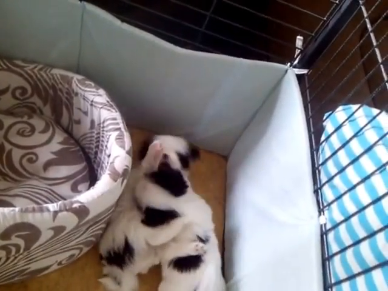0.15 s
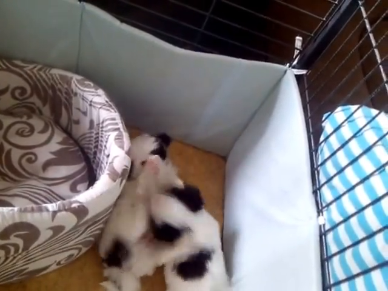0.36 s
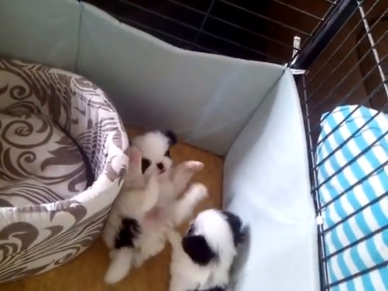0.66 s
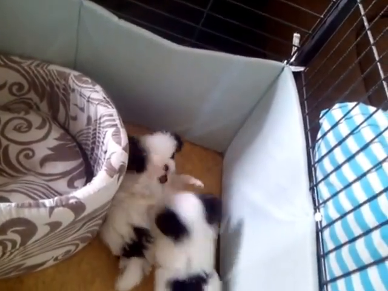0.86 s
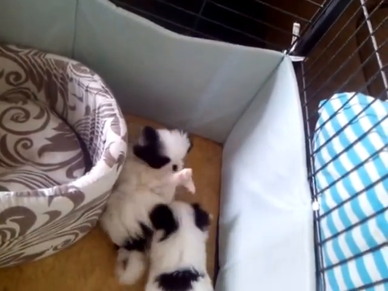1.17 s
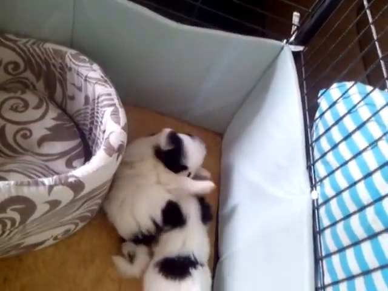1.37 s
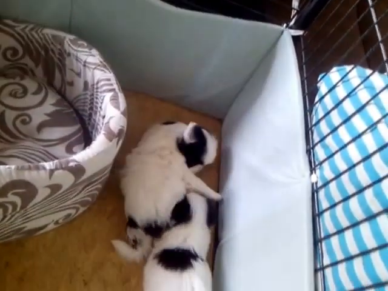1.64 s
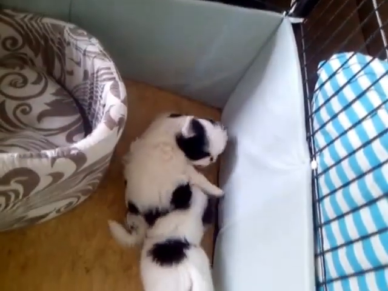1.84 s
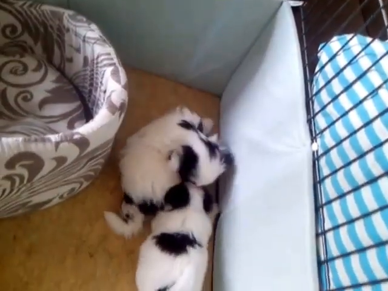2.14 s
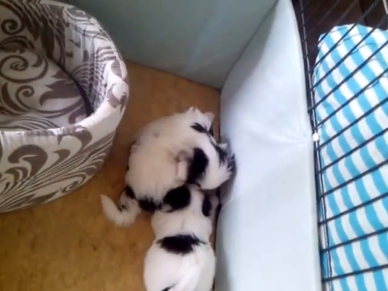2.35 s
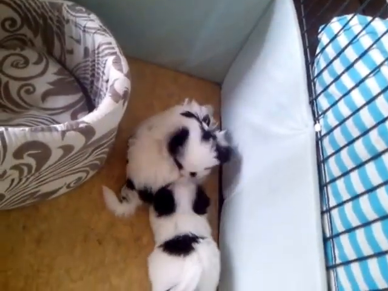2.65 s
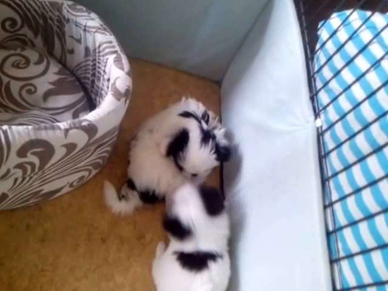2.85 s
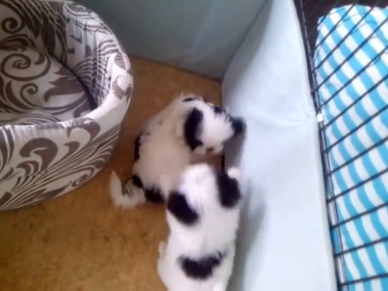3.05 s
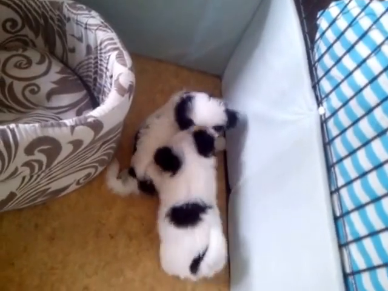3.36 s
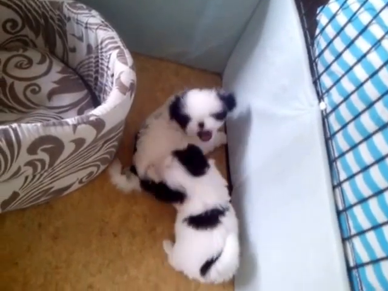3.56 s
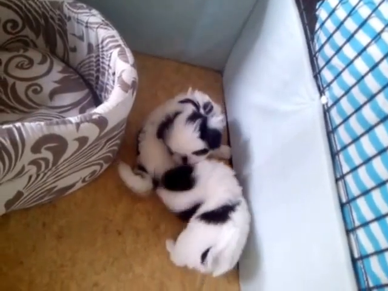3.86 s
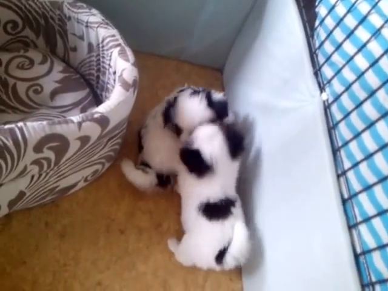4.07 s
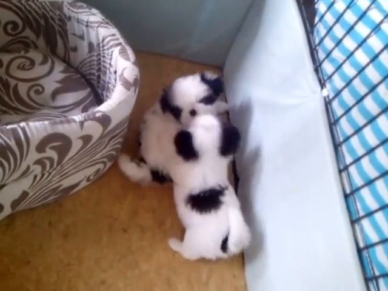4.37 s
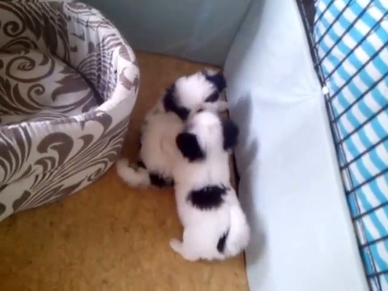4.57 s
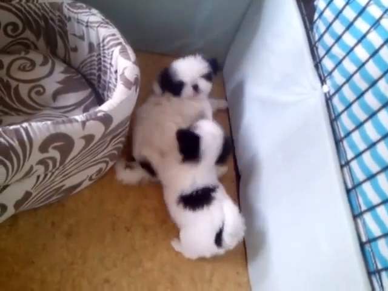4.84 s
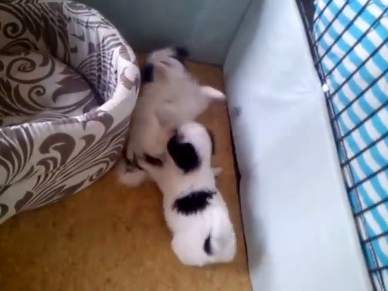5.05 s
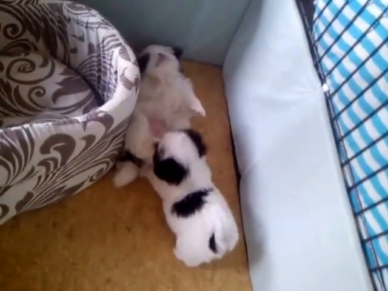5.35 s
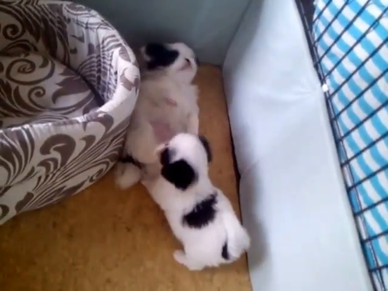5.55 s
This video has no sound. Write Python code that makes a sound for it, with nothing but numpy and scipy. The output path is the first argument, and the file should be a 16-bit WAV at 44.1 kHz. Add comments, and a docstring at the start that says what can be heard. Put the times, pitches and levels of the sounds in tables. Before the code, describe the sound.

Close, slightly dull-topped stereo pickup of puppies play-fighting indoors. Light pattering and low board thumps come first, with scratchy skids and a quick early snarl, then it quiets to little throaty grunts. Two piercing yelps, each cracking into a screech, leap far above everything else; raspy whines, short growls, faint steps and scattered claw clicks follow over faint room rumble and hiss.

```python
"""Cloth-lined pen in a small room: two small puppies wrestle close to two microphone ports.
Calls: vocal-fold pulses and torn air ring throat resonances, plus mouth resonances if the jaws open.
Claws: decaying noise snaps and skids, and grains rubbed over the weave.
Paws and bodies: low board rings, thuds and slaps, with rumble and creasing around them.
Room: a diffuse noise tail; faint rumble and hiss stay underneath."""
import sys
import numpy as np
from scipy import signal
from scipy.fft import rfft, irfft, next_fast_len
from scipy.io import wavfile
from scipy.ndimage import uniform_filter1d, map_coordinates

SR = 44100
rng = np.random.default_rng(int(sys.argv[2]) if len(sys.argv) > 2 else 0)


def log_audio(samples):
    """Write samples as a 16-bit WAV file to the path given in sys.argv[1]."""
    # one column per channel
    frames = np.atleast_2d(samples).T
    # limit to full scale, then quantise
    limited = np.clip(frames, -1, 1)
    pcm = np.round(limited * 32767).astype(np.int16)
    wavfile.write(sys.argv[1], SR, pcm)


N = 251811

# Still-room spectrum: freq_hz, gain_db
QUIET_COLOUR = [(20, -13.5), (110, 2), (230, -5.5), (1300, -20.5), (4300, -23), (7000, -31.5),
                (8300, -59.5)]
# Room decay: freq_hz, t60_s
ROOM_T60 = [(100, 0.99), (500, 0.35), (1500, 0.48), (4000, 0.33), (8000, 0.27)]
# Left minus right port: freq_hz, level_db
PORT_LEVEL_DB = [(200, 0.5), (1600, 0.91), (2500, 1.1), (4200, 5.1), (4800, 14.5), (6200, 6.5), (7400, 4.4)]
# Phase by which the left port leads: freq_hz, phase_rad
PORT_LEAD_RAD = [(400, 0), (1000, 1.23), (2300, 0.84), (3800, 0.89), (4800, 2), (6200, 3.5)]

# Fur and claws sliding over the lining, by stroke: start_s, length_s, gain_db
SCRAPE_STROKES = [(0.081, 0.18, -49), (0.249, 0.14, -48.5), (0.482, .08, -53), (0.662, .1, -38.5),
                  (0.782, 0.046, -37.5), (1.027, 0.023, -37), (1.259, 0.073, -54.5), (1.63, 0.17, -49.5),
                  (1.79, 0.044, -58.5), (2.136, 0.039, -52.5), (2.774, 0.1, -52.5), (2.834, 0.031, -39),
                  (2.901, .13, -50.5), (2.971, 0.022, -31), (3.251, .19, -52.5), (4.977, 0.2, -57)]
# Cloth spectrum under the scrapes: freq_hz, gain_db
CLOTH_COLOUR = [(500, -18.5), (1900, -17), (2900, 0), (4600, 5), (6000, 6.5), (7200, -3), (8300, -22)]
# Lining creasing: freq_hz, gain_db
CREASE_COLOUR = [(200, -12.5), (600, 3), (1000, -12.5), (2000, -6.5), (4000, -2.5), (8000, -34)]
# Spells of light footwork: start_s, end_s, step_gain_db
FOOTWORK_SPELLS = [(0.352, 1.0, -47.5), (1.148, 1.346, -47.5), (1.471, 1.85, -39), (3.24, 3.619, -44),
                   (4.1, 4.451, -44), (4.951, 5.55, -54.5)]
# Paws and bodies landing on the floor board: start_s, gain_db, ring_hz
LANDINGS = [(0.324, -35.5, 134), (0.505, -30, 274.5), (0.528, -33, 189), (0.66, -36, 164),
            (0.729, -36.5, 120), (0.949, -37.5, 187), (1.032, -36.5, 98.6), (1.2, -33.5, 139),
            (1.246, -31, 147), (1.481, -39, 97.7), (1.527, -33.5, 148), (1.571, -30, 143),
            (1.621, -29.5, 138), (1.715, -24.5, 135.6), (1.757, -33.5, 101.3), (2.982, -34, 101),
            (3.147, -34, 93.4), (3.266, -35, 154.4), (3.304, -33.5, 133), (3.521, -34, 146),
            (3.894, -35.5, 123.2), (4.008, -37.5, 115.5), (4.85, -40.5, 115), (5.198, -42.5, 130),
            (5.351, -42, 85.5)]
# Floor-board spectrum: freq_hz, gain_db
BOARD_COLOUR = [(40, -42), (75, 3), (130, 6), (300, -8), (500, -20), (900, -25), (2000, -43)]
# Claws catching on lining and floor: start_s, gain_db
CLAW_CATCHES = [(0.1122, -32), (0.23, -29), (0.4243, -36), (0.5329, -35), (0.633, -38), (0.7671, -28),
                (0.9386, -35), (1.2295, -30.5), (1.6516, -31), (1.7162, -23), (1.918, -37), (2.429, -45.5),
                (2.576, -50.5), (3.5322, -26), (3.546, -23.5), (4.4716, -25), (5.003, -32.5), (5.2902, -19),
                (5.5983, -45)]
# Claw-contact spectrum: freq_hz, gain_db
CLAW_SPECTRUM = [(600, -31), (1900, -30.5), (2800, -3.5), (4500, 11), (6000, 5.5), (7300, -7.5),
                 (8300, -49)]

# Muffled calls: start_s, length_s, pitch_hz, roughness_0_1, throat_db
WHIMPER_CALLS = [(.158, 0.03, 1044, .12, -42), (1.63, .1, 920, 0.3, -57.5), (1.735, 0.098, 903, 0.1, -56),
                 (4.3, .1, 927, .6, -56.5)]
GRUNT_CALLS = [(.13, 0.067, 433, .4, -49), (1.13, 0.092, 426.4, 0.058, -53),
               (2.443, .018, 470.6, 0.22, -41.5), (2.464, 0.018, 452, 0.21, -40.5),
               (2.533, 0.018, 440, 0.49, -49), (2.578, .02, 452, .3, -44), (2.613, 0.023, 431, 0.14, -45),
               (2.67, .075, 370, .05, -56), (2.75, 0.14, 263, 0.21, -52.5), (4.238, 0.046, 431, 0.12, -44),
               (4.273, 0.03, 471, 0.25, -41.5), (5.4, 0.065, 450.3, 0.2, -54)]
# Open-mouthed calls: start_s, length_s, pitch_hz, roughness_0_1, throat_db, mouth_db
GROWL_CALLS = [(3.527, 0.056, 162.2, 0.36, -41.5, -46.5), (4.706, 0.14, 268.8, .38, -45.5, -43.5),
               (4.826, .095, 321, 0.23, -48.5, -47), (5.26, 0.086, 513.8, .55, -49, -43.5)]
SNARL_CALLS = [(.213, 0.07, 209.6, 0.45, -36.5, -35.5)]
WHINE_CALLS = [(4.392, 0.055, 882, .75, -57, -40), (4.443, .1, 1020, .3, -55, -39.5)]
# Yelps: start_s, length_s, top_pitch_hz, top_time_s, jaws_open_s, voice_break_s,
# mouth_db, accent_db, fade_db (event times count from start_s)
YELP_CALLS = [(3.633, 0.088, 885, .1, 0.038, .072, -16, 2, -4),
              (3.924, 0.089, 788, .058, .031, .064, -17.5, 7, 7.5)]
# Throat resonances: freq_hz, gain_db
THROAT_COLOUR = [(90, -20), (200, -4.5), (330, -4), (480, 6), (680, -14), (1100, -11.5), (1700, -17.5),
                 (4000, -44)]
GRUNT_COLOUR = [(120, -12), (260, -9), (450, -2.5), (700, -14), (1250, -21.5), (2000, -25.5), (4000, -34)]
TIGHT_COLOUR = [(250, -25), (500, 8), (800, 2.5), (1100, 1.5), (1500, -19), (2000, -4.5), (3500, -50)]
# Mouth resonances by mouth shape: freq_hz, gain_db
WIDE_COLOUR = [(700, -46.5), (1400, -27), (2100, -22), (2600, 4.5), (3000, -15), (3700, 9), (4200, -7.5),
               (4900, -21.5), (5650, -12.5), (6300, -28.5), (7200, -21), (8200, -53)]
NARROW_COLOUR = [(800, -50), (1500, -8.5), (2150, -18), (2800, 12), (3250, 0), (3700, 16), (4300, -21.5),
                 (5000, -12.5), (5500, -1), (6300, -5), (6900, -21), (8200, -38)]
WHINE_COLOUR = [(900, -41.5), (2000, 3.5), (3000, 13), (3700, 1), (5000, 6.5), (6000, -5), (8000, -49)]
SNARL_COLOUR = [(800, -21), (1400, -8), (1800, 11.5), (2400, 3), (3500, 6), (4500, -11), (6000, 2),
                (8000, -22.5)]
GROWL_COLOUR = [(700, -26), (1300, 2), (2200, 0), (3200, 1.5), (5000, 2.5), (6200, -2.5), (8000, -28.5)]
# Air spectrum of the high open calls: freq_hz, gain_db
SCREECH_COLOUR = [(700, -40), (1900, -6), (2700, 1), (3800, -1.5), (5300, 4), (7000, -16.5), (8200, -50.5)]

TOP_HZ = 8400  # upper band limit
YELP_SCOOP, YELP_THROAT_DB = .48, -41.5  # scoop: share below top pitch at the start
SHUT_DB, PARTING_DB = -21, -15.5  # mouth gain at the start, just before the jaws fly open
JAW_S, SETTLE_S, BREAK_S = 0.015, 0.0085, 0.016  # jaws open, accent passes, voice breaks
ONSET_ROUGH, CLEAR_ROUGH, BROKEN_ROUGH = .55, 0.076, .87  # yelp roughness, 0-1
WAVER_OCTAVES, WAVER_DB, WAVER_RATE_HZ = .025, 1.5, 70  # pitch and level unsteadiness
YELP_FLUTTER_DB = .8
GRUNT_RASP = 3.2


def amp(db):
    """Decibels to gain."""
    return 10 ** (np.asarray(db) / 20)


def unit(x):
    """Scale to rms 1."""
    return x / np.sqrt(np.mean(x ** 2) + 1e-20)


def along(points, hz):
    """(freq_hz, value) points interpolated over log frequency."""
    f, v = np.transpose(points)
    return np.interp(np.log(hz + 1), np.log(f + 1), v)


def wobble(rate_hz, n):
    """Smooth random curve of n samples, rate_hz knots a second."""
    knots = rng.standard_normal(int(n * rate_hz / SR) + 4)
    return map_coordinates(knots, [np.arange(n) * rate_hz / SR])


def filtered(x, response):
    """x times a complex frequency response."""
    n = x.shape[-1]
    m = next_fast_len(n + 4096)
    return irfft(rfft(x, m) * response(np.fft.rfftfreq(m, 1 / SR)), m)[..., :n]


def coloured(x, points, size=2048):
    """x through a causal minimum-phase filter of the given spectrum."""
    cepstrum = irfft(np.log(amp(along(points, np.fft.rfftfreq(size, 1 / SR)))))
    cepstrum[1:size // 2] *= 2
    cepstrum[size // 2 + 1:] = 0
    impulse = irfft(np.exp(rfft(cepstrum)))
    return signal.fftconvolve(x, impulse)[:len(x)]


def noise(points, n):
    """Coloured noise of rms 1."""
    return unit(filtered(rng.standard_normal(n), lambda hz: amp(along(points, hz))))


def held(x, window_s):
    """x with its short-time rms held at 1."""
    return x / np.sqrt(np.abs(uniform_filter1d(x * x, int(window_s * SR))) + 1e-12)


def add(track, start_s, sound):
    """Mix a sound into the track from start_s."""
    part = track[max(round(start_s * SR), 0):][:len(sound)]
    part += sound[:len(part)]


def still_room(level_db=-62, apart_db=-6):
    """Faint rumble and hiss, partly shared by the ports."""
    shared = noise(QUIET_COLOUR, N)
    separate = np.array([noise(QUIET_COLOUR, N), noise(QUIET_COLOUR, N)])
    return amp(level_db) * (shared + amp(apart_db) * separate)


def room(x, gap_s=0.0018):
    """Diffuse wall response: decaying noise, its bass alike at both ports."""
    hz, t, z = signal.stft(rng.standard_normal((2, SR // 2)), SR, nperseg=256)
    apart = np.clip(hz / 1800, 0, 1)[:, None]
    z = np.array([z[0] + apart * z[1], z[0] - apart * z[1]]) / np.sqrt(1 + apart ** 2)
    decay = amp(-60 * t / along(ROOM_T60, hz)[:, None])
    tail = signal.istft(z * decay, SR, nperseg=256)[1]
    tail *= 1 - np.exp(-(np.arange(tail.shape[1]) / SR / gap_s) ** 2)
    return signal.fftconvolve(x[None], tail / np.linalg.norm(tail[0]), axes=1)[:, :N]


def rubbing(fur_db=-63, grain_db=2.0, catch_db=3.0, roundness=0.4, lateness=1.39):
    """Claws stick and slip over the weave in tiny grains; fur brushes faintly throughout."""
    pressure = amp(fur_db + 4 * wobble(12, N))
    for start_s, length_s, db in SCRAPE_STROKES:
        place = np.linspace(0, 1, int(length_s * SR))
        stroke = np.abs(np.sin(np.pi * place ** lateness)) ** roundness
        add(pressure, start_s, amp(db) * stroke)
    unevenness_db = grain_db * wobble(900, N) + catch_db * wobble(90, N)
    slips = rng.standard_normal(N) * amp(unevenness_db)
    return pressure * held(coloured(slips, CLOTH_COLOUR), .035)


def shuffling(landings, level_db=-9, lumps_db=3, roll_s=0.23, crease_db=-23, creases_db=5):
    """Around each landing, rolling bodies rumble the board and crease the lining."""
    weight = np.sqrt(np.abs(uniform_filter1d(landings ** 2, int(roll_s * SR))))
    rumble = amp(level_db + lumps_db * wobble(40, N)) * noise(BOARD_COLOUR, N)
    creases = amp(crease_db + creases_db * wobble(70, N)) * noise(CREASE_COLOUR, N)
    return weight * (rumble + creases)


def light_steps(scatter_db=6.0, ring_hz=270, spread=.3, count=5):
    """Paws patter unevenly through each spell: rows of start_s, gain_db, ring_hz."""
    steps = []
    for start_s, end_s, db in FOOTWORK_SPELLS:
        times_s = start_s + (end_s - start_s) * (np.arange(count) + rng.random(count)) / count
        for step_s, (weight, place) in zip(times_s, rng.standard_normal((count, 2))):
            steps.append((step_s, db + scatter_db * weight, ring_hz * np.exp(spread * place)))
    return steps


def thumps(t60_s=0.12, attack_s=0.0046, ring_db=2, thud_db=-1, slap_db=-11, slap_t60_s=0.045):
    """Soft paws slap the lining and push the board into a few low cycles with a dull thud."""
    out, t = np.zeros(N), np.arange(SR // 4) / SR
    for start_s, db, hz in LANDINGS + light_steps():
        ring = amp(ring_db) * np.sin(2 * np.pi * hz * t)
        thud = amp(thud_db) * held(noise(BOARD_COLOUR, len(t)), 0.057)
        slap = amp(slap_db - 60 * t / slap_t60_s) * noise(CREASE_COLOUR, len(t))
        attack = 1 - np.exp(-t / attack_s)
        add(out, start_s, amp(db) * attack * (amp(-60 * t / t60_s) * (ring + thud) + slap))
    return out


def claws(snap_t60_s=0.015, skid_t60_s=0.13, skid_db=-11, tick_db=-3.0):
    """Each claw snaps free and skids on for a moment."""
    out, t = np.zeros(N), np.arange(SR // 8) / SR
    for start_s, db in CLAW_CATCHES:
        snap = amp(-60 * t / snap_t60_s)
        skid = amp(skid_db - 60 * t / skid_t60_s + 2.0 * wobble(500, len(t)))
        contact = amp(tick_db) * held(noise(CLAW_SPECTRUM, len(t)), 0.00053)
        add(out, start_s, amp(db) * (snap + skid) * contact)
    return out


def folds(pitch_hz, rough, jitter, rasp, count=44):
    """Vocal-fold pulses, air torn through them once a cycle, and the air's power share."""
    n, k = len(pitch_hz), np.arange(1, count + 1)[:, None]
    # strained folds lose their timing
    unsteady_hz = pitch_hz * (1 + jitter * rough * wobble(400, n))
    phase = 2 * np.pi * np.cumsum(unsteady_hz) / SR
    pulses = unit(np.sum(np.cos(k * phase) * (k * pitch_hz < TOP_HZ), axis=0))
    air = unit(rng.standard_normal(n) * (1 + np.cos(phase)))
    return pulses, air, np.clip(rasp * rough ** 2, 0, 1)


def sounded(pulses, air, share, tone_colour, air_colour):
    """Pulses and air through their resonances, mixed at a steady rms near 1."""
    tone = held(coloured(pulses, tone_colour), 0.033)
    hiss = held(coloured(air, air_colour), 0.011)
    return np.sqrt(1 - share) * tone + np.sqrt(share) * hiss


def muffled_calls(calls, throat, jitter, flutter_db, rasp):
    """Jaws shut or full of fur: only the throat rings."""
    out = np.zeros(N)
    for start_s, gate, pitch_hz, rough, db in calls:
        source = folds(pitch_hz, rough, jitter, rasp)
        call = amp(db) * sounded(*source, throat, throat)
        flutter = amp(flutter_db * rough * wobble(230, len(gate)))
        add(out, start_s, gate * call * flutter)
    return out


def open_calls(calls, throat, mouth, air_colour, jitter, flutter_db, rasp):
    """The folds ring the throat and the bright resonances of the open mouth."""
    out = np.zeros(N)
    for start_s, gate, pitch_hz, rough, throat_db, mouth_db in calls:
        source = folds(pitch_hz, rough, jitter, rasp)
        throat_sound = amp(throat_db) * sounded(*source, throat, throat)
        mouth_sound = amp(mouth_db) * sounded(*source, mouth, air_colour)
        flutter = amp(flutter_db * rough * wobble(212, len(gate)))
        add(out, start_s, gate * (throat_sound + mouth_sound) * flutter)
    return out


def span(length_s, fade_s):
    """Time since a call's start, and its soft-edged gate."""
    t = np.arange(int(length_s * SR)) / SR
    return t, np.clip(np.minimum(t, length_s - t) / fade_s, 0, 1)


def pushes(rows, swell_db, bend_oct, slide_oct, fade_s):
    """Each call is an unsteady arch of effort: level and pitch follow it while pitch drifts."""
    for start_s, length_s, hz, rough, *levels_db in rows:
        t, gate = span(length_s, fade_s)
        place = 2 * t / length_s - 1  # -1 at the start, 1 at the end
        slack, waver = place ** 2, wobble(WAVER_RATE_HZ, len(t))
        octaves = slide_oct * place / 2 - bend_oct * slack + WAVER_OCTAVES * waver
        arched_db = [db - swell_db * slack + WAVER_DB * waver for db in levels_db]
        yield start_s, gate, hz * 2 ** octaves, rough, *arched_db


def yelp(start_s, length_s, top_hz, top_s, open_s, break_s, db, accent_db, fade_db):
    """Pitch scoops up, jaws fly open with an accent, the clear voice breaks into a screech."""
    t, gate = span(length_s, fade_s=0.001)
    parting_s = open_s - JAW_S
    pitch_hz = top_hz * (1 - YELP_SCOOP * (1 - t / top_s) ** 2)
    mouth_db = db + np.interp(t, [0, parting_s, open_s, open_s + SETTLE_S, length_s],
                              [SHUT_DB, PARTING_DB, accent_db, 0, -fade_db])
    rough = np.interp(t, [0, parting_s, break_s - BREAK_S / 2, break_s + BREAK_S / 2],
                      [ONSET_ROUGH, CLEAR_ROUGH, CLEAR_ROUGH, BROKEN_ROUGH])
    throat_db = YELP_THROAT_DB + SHUT_DB * np.clip(1 - t / parting_s, 0, 1)
    return start_s, gate, pitch_hz, rough, throat_db, mouth_db


def grumbles():
    """Low calls: throat-only grunts, an open snarl and open growls."""
    grunts = muffled_calls(
        pushes(GRUNT_CALLS, swell_db=5.5, bend_oct=.1, slide_oct=-0.025, fade_s=0.0015),
        GRUNT_COLOUR, jitter=0.15, flutter_db=11.5, rasp=GRUNT_RASP)
    snarl = open_calls(
        pushes(SNARL_CALLS, swell_db=6, bend_oct=0.027, slide_oct=-0.34, fade_s=0.0029),
        THROAT_COLOUR, SNARL_COLOUR, SNARL_COLOUR, jitter=0.23, flutter_db=3, rasp=2.3)
    growls = open_calls(
        pushes(GROWL_CALLS, swell_db=6, bend_oct=.17, slide_oct=-.05, fade_s=0.005),
        THROAT_COLOUR, GROWL_COLOUR, GROWL_COLOUR, jitter=0.17, flutter_db=5.5, rasp=3.1)
    return grunts + snarl + growls


def cries():
    """High calls: two yelps that break into a screech, open whines and throat-only whimpers."""
    first = open_calls(
        [yelp(*YELP_CALLS[0])], TIGHT_COLOUR, WIDE_COLOUR, SCREECH_COLOUR,
        jitter=0.045, flutter_db=YELP_FLUTTER_DB, rasp=2.0)
    second = open_calls(
        [yelp(*YELP_CALLS[1])], TIGHT_COLOUR, NARROW_COLOUR, SCREECH_COLOUR,
        jitter=.03, flutter_db=YELP_FLUTTER_DB, rasp=1.2)
    whines = open_calls(
        pushes(WHINE_CALLS, swell_db=1.5, bend_oct=0.11, slide_oct=-.03, fade_s=.004),
        TIGHT_COLOUR, WHINE_COLOUR, SCREECH_COLOUR, jitter=.13, flutter_db=2, rasp=2.0)
    whimpers = muffled_calls(
        pushes(WHIMPER_CALLS, swell_db=5, bend_oct=0.049, slide_oct=-0.36, fade_s=.006),
        TIGHT_COLOUR, jitter=0.12, flutter_db=7, rasp=0.69)
    return first + second + whines + whimpers


def scene():
    """Direct sound with a phase difference between the ports, room response and still room."""
    landings = thumps()
    floor = landings + shuffling(landings)
    scratch = claws() + rubbing()
    low, high = grumbles(), cries()

    def lead(hz):
        return np.exp(1j * along(PORT_LEAD_RAD, hz) * np.array([[.5], [-.5]]))

    direct = filtered(high + low + scratch + floor, lead)
    calls_sent = amp(-6.5) * high + amp(-11) * low
    contact_sent = amp(-13.5) * scratch + amp(-14.0) * floor
    return direct + room(calls_sent + contact_sent) + still_room()


def record(dry):
    """Right port shaded in the treble; peaks rounded off, nothing kept above TOP_HZ."""
    def ports(hz):
        pair = amp(along(PORT_LEVEL_DB, hz) * np.array([[.5], [-.5]]))
        return pair / np.sqrt(np.mean(pair ** 2, axis=0))

    heard = filtered(dry, ports)
    rounded = heard / (1 + np.abs(heard / .82) ** 8) ** (1 / 8)
    return filtered(rounded, lambda hz: hz < TOP_HZ)


dry = scene()
out = record(dry)
log_audio(out)
```